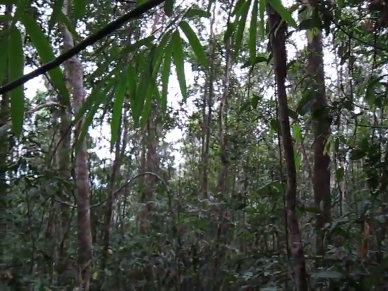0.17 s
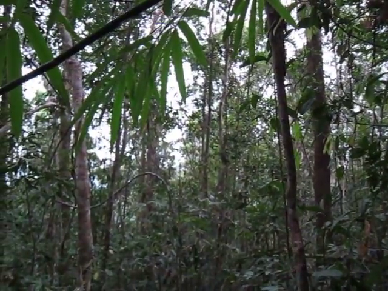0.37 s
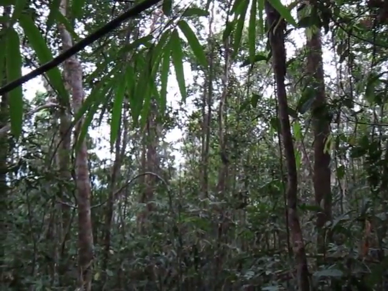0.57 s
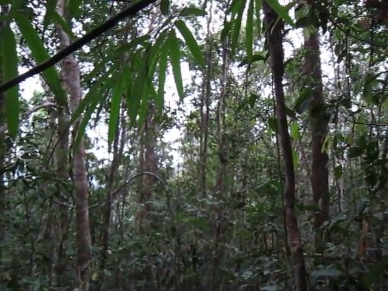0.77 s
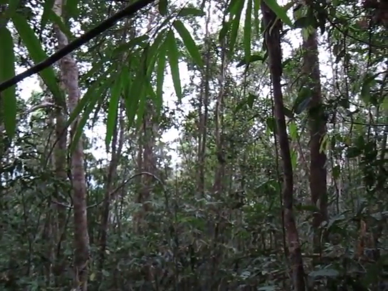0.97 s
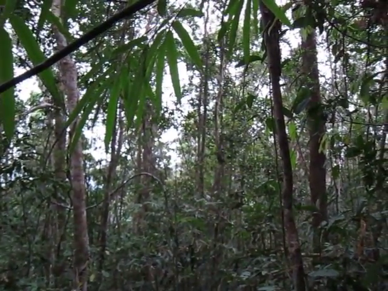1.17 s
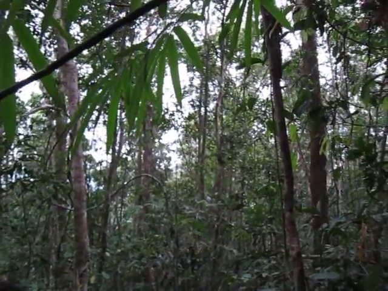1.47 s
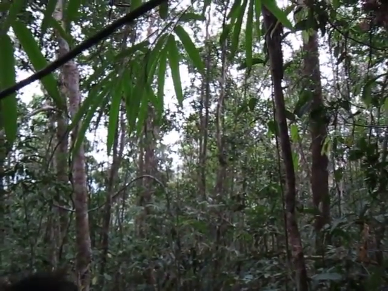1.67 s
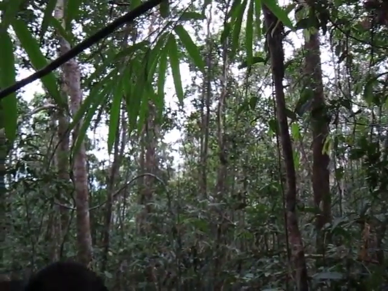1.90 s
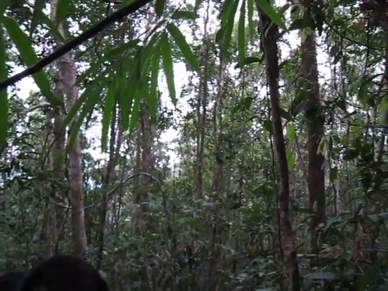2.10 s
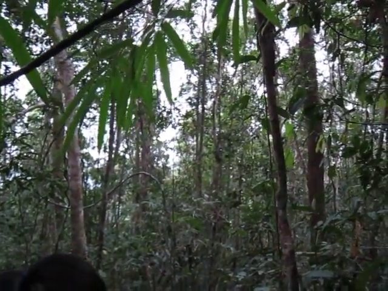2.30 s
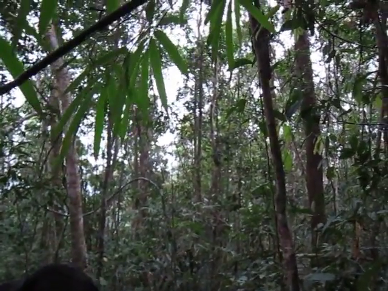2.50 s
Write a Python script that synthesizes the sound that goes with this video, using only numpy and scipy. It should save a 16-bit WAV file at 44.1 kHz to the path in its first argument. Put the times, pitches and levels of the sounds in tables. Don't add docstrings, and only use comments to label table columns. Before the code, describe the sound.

Clear, rising ape whoops echo among the trees, with nearby leaf rustling and small wooden knocks

```python
import sys
import numpy as np
from scipy import signal
from scipy.io import wavfile
from scipy.ndimage import uniform_filter1d

SR = 44100
rng = np.random.default_rng(int(sys.argv[2]) if len(sys.argv) > 2 else 0)


def ratio_of_db(decibels):
    return 10 ** (np.asarray(decibels, float) / 20)


def wav_out(sig):
    wavfile.write(sys.argv[1], SR, np.round(np.clip(np.atleast_2d(sig).T, -1, 1) * 32767).astype(np.int16))


N = 116865
LEAD_S = 1.1


def unit(x):
    return x / np.sqrt(np.mean(x ** 2))


def band(x, hz, width):
    edges = np.clip(hz * 2 ** (np.array([-.5, .5]) * width), 8, .45 * SR)
    return signal.sosfilt(signal.butter(2, edges, "band", fs=SR, output="sos"), x)


def walk(rate, size):
    hold = int(SR / rate)
    levels = np.repeat(rng.standard_normal(size // hold + 1), hold)
    return 1.68 * uniform_filter1d(uniform_filter1d(levels, hold), hold)[:size]


def ramp(u, span):
    return np.sin(np.pi / 2 * np.clip(u / span, 0, 1)) ** 2


# (frequency [Hz], level [dB])
HUSH_SPECTRUM = [(25, 8), (100, -6.5), (300, -13.5), (1000, -21), (3000, -21), (6000, -29.5), (11000, -35),
                 (16000, -44.5)]


def hush():
    out = 0
    swell = walk(1.0, N)
    corner_hz, corner_db = np.array(HUSH_SPECTRUM).T
    for hz in 25 * 2 ** np.arange(0, 9.4, .5):
        db = np.interp(np.log(hz), np.log(corner_hz), corner_db)
        db = db + .4 * swell + .7 * walk(8, N)
        out = out + ratio_of_db(db) * band(rng.standard_normal(N), hz, 0.52)
    return ratio_of_db(-48) * unit(out)


# (time [s], level [dB])
SHUFFLE_LEVELS = [(.8, -80.5), (1.1, -56.5), (1.4, -54), (1.8, -63.5), (2.1, -55), (2.65, -69)]


def shuffle(t):
    db = np.interp(t, *np.array(SHUFFLE_LEVELS).T) + 3 * walk(30, N)
    return ratio_of_db(db) * unit(band(rng.standard_normal(N), 900, 2.5))


def insect(t):
    start_s, rise_s, low_hz, high_hz, width_hz = 2.49, .1, 3650, 3940, 310
    share = ramp(t - start_s, rise_s)
    phase = 2 * np.pi * np.cumsum(low_hz + share * (high_hz - low_hz)) / SR
    edge = signal.butter(6, width_hz, fs=SR, output="sos")
    one = unit(signal.sosfilt(edge, rng.standard_normal(N)))
    two = unit(signal.sosfilt(edge, rng.standard_normal(N)))
    buzz = one * np.sin(phase) + two * np.cos(phase)
    return ratio_of_db(-55) * share ** 0.52 * buzz


# (level [dB], centre [Hz])
RUSTLE_BANDS = [(-79, 5100), (-55, 3900), (-46.5, 5800), (-49.5, 4800), (-48.5, 5600), (-49, 5800),
                (-52, 5700), (-67, 7200), (-53, 5000), (-51.5, 4500), (-58, 5700), (-53.5, 6500),
                (-51, 7200), (-51, 8900), (-60.5, 4500)]
RUSTLE_ONSETS = [.12, .89, 1.135, 1.24, 1.33, 1.47, 1.53, 1.68, 1.97, 2.06, 2.13, 2.26, 2.34, 2.44, 2.5]
RUSTLE_LENGTHS = [.12, .12, .1, .09, .11, .06, .07, .08, .06, .06, .12, .08, .08, .05, .15]


def leaves(t):
    grains_per_s, spread_db, brush, patchy_db = 2500, 3.1, .9, 1.7
    edge_s, fade_s, octaves = .02, .1, 2.6
    size = ratio_of_db(spread_db * rng.exponential(size=N)) * (rng.random(N) < grains_per_s / SR)
    grains = unit(size * rng.standard_normal(N)) + brush * rng.standard_normal(N)
    grains = grains * ratio_of_db(patchy_db * walk(45, N))
    out = np.zeros(N)
    for start, length, (db, hz) in zip(RUSTLE_ONSETS, RUSTLE_LENGTHS, RUSTLE_BANDS):
        burst = ramp(t - start, edge_s) * ramp(start + length + fade_s / 2 - t, fade_s)
        out += ratio_of_db(db) * burst * unit(band(grains, hz, octaves))
    return out


def snaps(rows, width, crack_s, tail_s, tail_db):
    size = 4096
    out = np.zeros(N + size)
    u = np.arange(size) / SR
    decay = np.exp(-u / crack_s) + ratio_of_db(tail_db) * np.exp(-u / tail_s)
    for s, db, hz in rows:
        crack = band(rng.standard_normal(size) * decay, hz, width)
        start = int(s * SR)
        out[start:start + size] += ratio_of_db(db) * crack / np.abs(crack).max()
    return out[:N]


# (time [s], peak [dB], ring [Hz])
TWIG_TICKS = [(1.1373, -37, 10700), (1.1578, -40, 6180), (1.1807, -25, 7840), (1.2184, -26.5, 9570),
              (1.2454, -38, 6120), (1.3558, -27.5, 9590), (1.3992, -47, 7930), (1.491, -38, 5530),
              (1.5584, -35, 5860), (1.6914, -28, 7130), (1.731, -33.5, 5550), (1.8986, -38, 9200),
              (1.9944, -34, 8120), (2.0806, -35, 5660), (2.321, -29.5, 5980), (2.3615, -54, 7430),
              (2.4523, -31, 5570), (2.6289, -46, 8460)]
# (time [s], peak [dB], ring [Hz])
WOOD_KNOCKS = [(.921, -37, 1700), (.942, -49, 900), (1.018, -46.5, 3100), (1.063, -41.5, 520),
               (1.296, -39, 2300), (1.399, -34.5, 3000), (1.497, -28, 3600), (1.556, -34, 2600),
               (1.795, -44.5, 4500), (1.847, -39, 970), (1.849, -36, 2600), (1.993, -50, 2200),
               (2.035, -34, 1620), (2.08, -34, 1622), (2.122, -45, 1700), (2.32, -29.5, 3200),
               (2.367, -41, 1700)]
# (time [s], peak [dB], ring [Hz])
STEM_TAPS = [
    (1.016, -38, 613),
    (1.357, -40, 383),
    (1.644, -52, 800),
    (1.99, -45, 453),
]


def twigs():
    ticks = snaps(TWIG_TICKS, 1.9, .0006, .007, -8)
    knocks = snaps(WOOD_KNOCKS, .9, .002, 0.036, -15.5)
    taps = snaps(STEM_TAPS, 0.48, 0.0051, 0.027, -22)
    return ticks + knocks + taps


# (centre [Hz], near t60 [s], near level [dB], far t60 [s], far level [dB])
SCATTER = [(1128, 0.7, -4.5, 2.42, -12), (2525, 0.72, -4, 2, -20), (3600, 0.54, -1, 3.1, -13.5),
           (5100, 0.91, -1.5, 1.4, -11.5)]
ECHO_DELAYS = [.021, .047, .083, .125, .19]
ECHO_LEVELS = [-15, -15, -14, -12, -17]


def forest():
    build_s = .07
    t = np.arange(2 * SR) / SR
    out = np.zeros(len(t))
    for delay, db in zip(ECHO_DELAYS, ECHO_LEVELS):
        out[int(delay * SR)] = ratio_of_db(db)
    for hz, near_t60, near_db, far_t60, far_db in SCATTER:
        noise = unit(band(rng.standard_normal(len(t)), hz, 0.68)) * np.sqrt(hz / SR / SR * 10)
        decay = ratio_of_db(near_db - 60 * t / near_t60) + ratio_of_db(far_db - 60 * t / far_t60)
        out = out + noise * ramp(t, build_s) ** .5 * decay
    return out


# (multiple of the pitch [1], level [dB])
VOICE_PARTIALS = [(1, 0), (2, -21), (3, -13), (4, -26), (5, -35), (6, -45)]
BLOOM_LOSS = [.2, -.6, 3.8, 3.2, 4, 5]


def whoops(t, starts, calls, partials, depth):
    swoop, swoop_s, swoop_bend = .18, .14, 2.6
    sag_depth, sag_s, sag_loss_db = .055, .085, 2.2
    attack_s, release_s, droop_db_per_s = 0.065, 0.035, 10.5
    out = np.zeros((2, len(t)))
    shake = 0.0014 * walk(40, len(t))
    wobble = ratio_of_db(2.5 * walk(24.99, len(t)))
    for start, (length, top_hz, db, turn_db) in zip(starts, calls):
        now = (t > start) & (t < start + length)
        u = t[now] - start
        sag = sag_depth * np.clip(1 - (length - u) / sag_s, 0, 1) ** 2
        under = swoop * np.clip(1 - u / swoop_s, 0, 1) ** swoop_bend + sag
        phase = 2 * np.pi * np.cumsum(top_hz * (1 - depth * under + shake[now])) / SR
        effort_db = db - droop_db_per_s * np.clip(u - swoop_s, 0, 1) - sag_loss_db * 100 * sag
        effort = ratio_of_db(effort_db) * ramp(u, attack_s) * ramp(length - u, release_s)
        for (k, level_db), loss in zip(partials, BLOOM_LOSS):
            bloom = ratio_of_db(level_db - loss * 100 * under)
            tone = np.sqrt(2) * effort * wobble[now] * bloom * np.sin(k * phase)
            out[:, now] += tone * ratio_of_db([[0], [turn_db * k]])
    return out


# (length [s], level [dB])
FAR_CALLS = [(.3, -71), (0.16, -60.5), (.13, -52), (0.224, -57), (.2, -61.5), (0.1, -81), (0.065, -43.5),
             (0.0936, -52), (0.075, -50)]
FAR_ONSETS = [0., 1.07, 1.18, 1.29, 1.57, 1.6, 2.07, 2.2, 2.46]
FAR_PITCHES = [5350, 1475, 1820, 1402, 1475, 1777, 1400, 1790, 1790]


def far_answers(t):
    calls = [(length, hz, db, 0) for hz, (length, db) in zip(FAR_PITCHES, FAR_CALLS)]
    return whoops(t, FAR_ONSETS, calls, VOICE_PARTIALS[:1], .3)


# (length [s], top pitch [Hz], level [dB], direct-path gain as head turns [dB])
APE_WHOOPS = [
    (.25, 1210, -15.5, 0),
    (.25, 1225, -24, 0),
    (.25, 1216, -24, -0.65),
    (.24, 1209, -25.5, 0.22),
    (0.248, 1189, -25, -1.13),
    (.25, 1196, -26.5, -1.56),
]
WHOOP_ONSETS = [-1.0, -.41, .203, .796, 1.411, 2.043]


def ape(t):
    return whoops(t, WHOOP_ONSETS, APE_WHOOPS, VOICE_PARTIALS, 1)


def scene():
    lead = int(LEAD_S * SR)
    t = np.arange(-lead, N) / SR
    now = t[lead:]
    around, direct = ape(t) + far_answers(t)
    scattered = signal.fftconvolve(around, forest())[:len(t)]
    heard = (ratio_of_db(2.5) * direct + scattered)[lead:]
    mic_top = signal.butter(2, 11200, fs=SR, output="sos")
    near = signal.sosfilt(mic_top, twigs() + leaves(now))
    return (heard + near + shuffle(now) + insect(now) + hush())[None]


def top_cut(x):
    return signal.sosfilt(signal.butter(12, 16420, fs=SR, output="sos"), x)


def record(dry):
    low_pass = signal.ellip(10, .3, 70, 15950, fs=SR, output="sos")
    cut = signal.sosfilt(low_pass, dry)
    return top_cut(cut)


dry = scene()
out = record(dry)
wav_out(out)
```